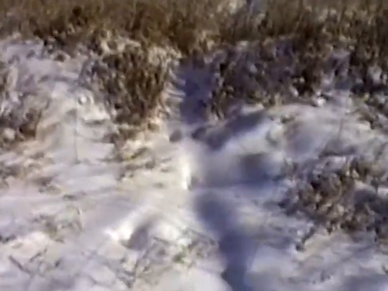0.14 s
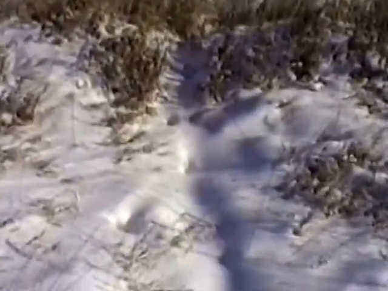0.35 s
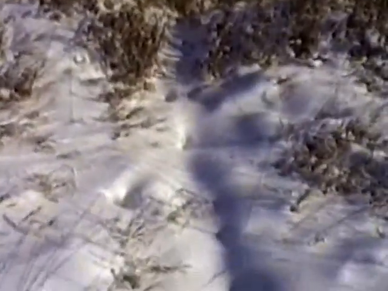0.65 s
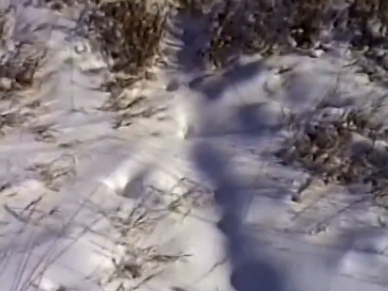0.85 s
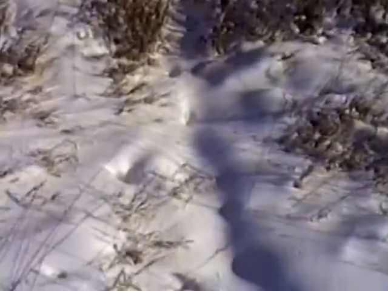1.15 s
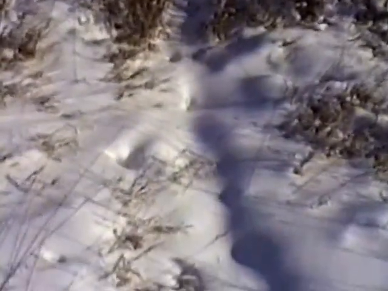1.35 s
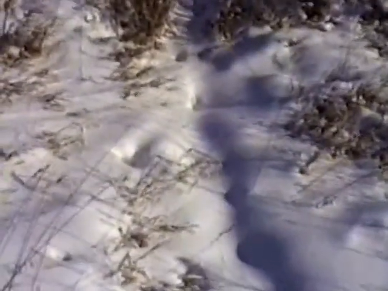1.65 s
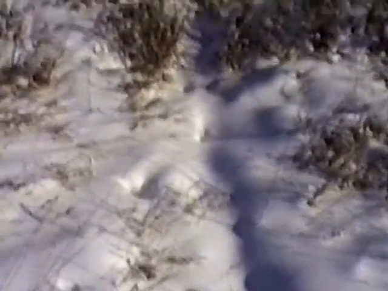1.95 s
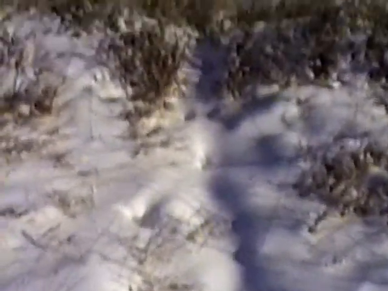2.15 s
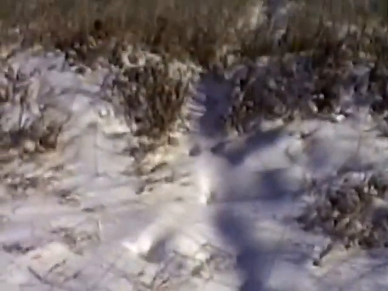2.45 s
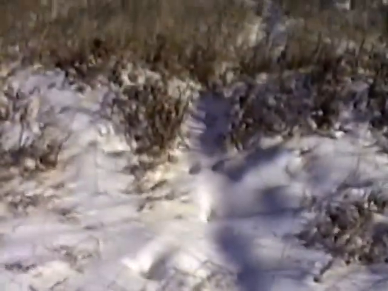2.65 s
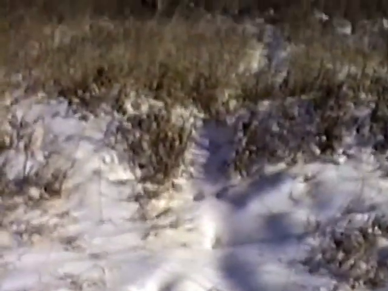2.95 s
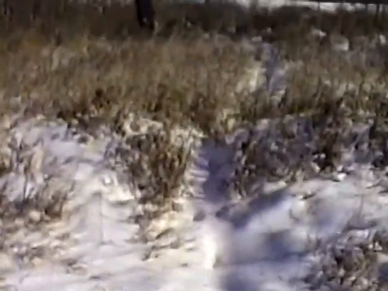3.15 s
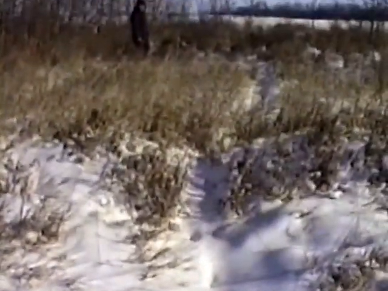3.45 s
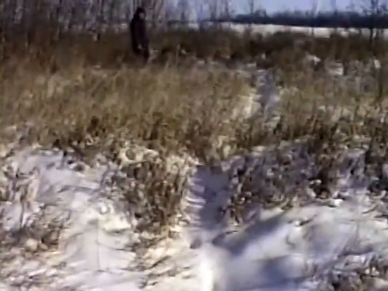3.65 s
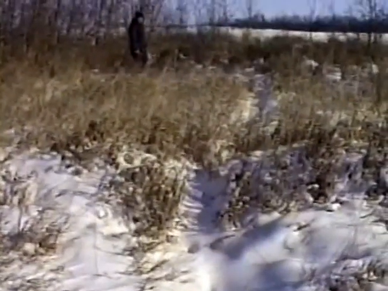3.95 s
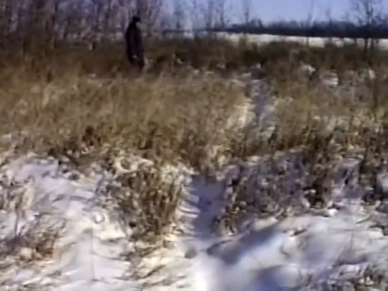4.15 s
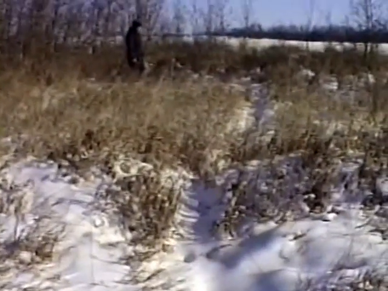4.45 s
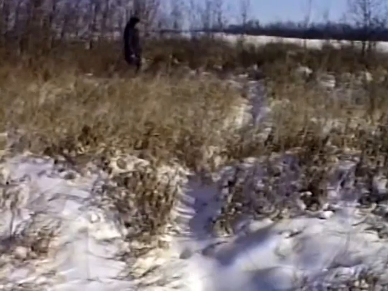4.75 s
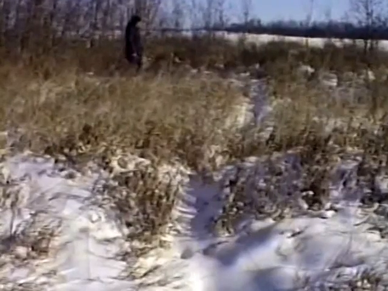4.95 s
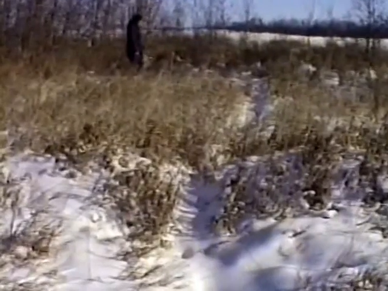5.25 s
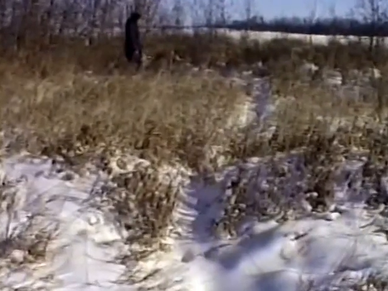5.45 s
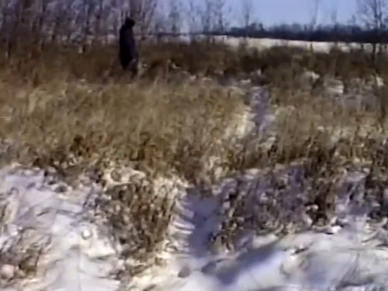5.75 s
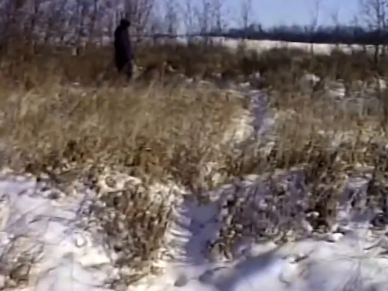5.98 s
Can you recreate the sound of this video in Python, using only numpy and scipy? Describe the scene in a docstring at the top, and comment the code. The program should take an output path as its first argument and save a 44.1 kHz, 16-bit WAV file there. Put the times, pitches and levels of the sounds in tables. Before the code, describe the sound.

Camera handling noise: hollow, hissy motor whirr throughout, sparse hard clicks at first, then bursts of scratchy rubbing and sharper knocks.

```python
"""A motor whirr under clicks and gloved rubbing, all hollowed by drifting comb notches, with hiss and whistles.
A tape camcorder in still, snowy country hears mostly itself. The whirr is coloured noise plus harmonics of
the head drum; rubs are noise of uneven slips; clicks are short pushes that ring the modes of the shell.
On playback two sound tracks mix in opposite polarity, one under a millisecond late and wavering."""
import sys
import numpy as np
from scipy import signal
from scipy.fft import rfft, irfft
from scipy.io import wavfile
from scipy.ndimage import uniform_filter1d, map_coordinates

SR = 44100
rng = np.random.default_rng(int(sys.argv[2]) if len(sys.argv) > 2 else 0)


def store_wav(level_fs):
    """Save 16-bit WAV to argv[1]."""
    pcm = np.round(np.clip(np.atleast_2d(level_fs), -1, 1) * 32767)
    wavfile.write(sys.argv[1], SR, pcm.T.astype(np.int16))


N = 269795
T = np.arange(N) / SR  # seconds
F = np.maximum(np.fft.rfftfreq(N, 1 / SR), 1)  # Hz, kept above zero for the logarithm

# resonant modes of the shell: pitch_hz, relative_level_db, t60_s (before stretching)
SHELL_MODES = [(140, -34, 0.044), (345, 6, 0.075), (409, -3, 0.064), (558, -8, 0.035), (765, -11.5, 0.075),
               (853, 3, 0.041), (987, 6, 0.026), (1104, -1, 0.075), (1440, 7.5, 0.034), (1640, 1, 0.036),
               (2060, -5, 0.023)]


def undb(db):
    """Amplitude ratio of a level in decibels: 20 dB is a factor of ten."""
    return 10 ** (np.asarray(db, float) / 20)


def level(x, db):
    """Scales a signal to an rms level, the root of its mean power."""
    return x * undb(db) / np.sqrt(np.mean(x ** 2))


def colour(x, points):
    """Linear filtering by a spectral envelope drawn through (Hz, dB) points on a log-frequency axis."""
    hz, db = np.transpose(points)
    envelope = undb(np.interp(np.log(F), np.log(hz), db))
    return irfft(rfft(x) * envelope, N)


def band(x, lo_hz, hi_hz):
    """Band-pass filtering with gentle, maximally flat skirts."""
    sos = signal.butter(2, [lo_hz, min(hi_hz, .45 * SR)], "bandpass", fs=SR, output="sos")
    return signal.sosfilt(sos, x)


def walk(rate_hz):
    """Slow random fluctuation: held random values, averaged twice over one hold; spread near 1."""
    hold = int(SR / rate_hz)
    steps = np.repeat(rng.standard_normal(N // hold + 1), hold)
    return 1.43 * uniform_filter1d(uniform_filter1d(steps, hold), hold)[:N]


def swelling_hiss(dry):
    """Amplitude-modulated noise: hiss, independent left and right, swells with the treble of the sound."""
    # hiss spectrum: pitch_hz, relative_db_per_hz
    hiss_spectrum = [(20, 0), (100, 15), (500, 2.5), (1300, -18), (3000, -5), (8000, 5.5), (12000, 1),
                     (16000, 5.5)]
    hiss_db = -71  # rms before swelling
    swell_share = .55  # share of the treble level, in dB, that the hiss follows
    treble_power = uniform_filter1d(band(dry[0], 3000, 11000) ** 2, size=512)
    swell = (treble_power / np.median(treble_power)) ** (swell_share / 2)
    hiss = [level(colour(rng.standard_normal(N), hiss_spectrum), hiss_db) for _ in range(2)]
    return swell * np.array(hiss)


def scan_whistles():
    """Beating: line-scan tones of camera and player, close in pitch, wander in level and phase."""
    # line-scan whistles: pitch_hz, level_db (rms, about which it wanders)
    whistles = [(15734.27, -62.5), (15747.2, -67.5)]
    total = np.zeros(N)
    for hz, db in whistles:
        gain = np.sqrt(2) * undb(db + 1.3 * walk(4))
        total += gain * np.sin(2 * np.pi * hz * T + .7 * walk(6))
    return total


def motor_noise():
    """Broadband machine noise: a fixed spectrum whose low part flickers in level."""
    # motor noise inside the shell: pitch_hz, relative_db_per_hz
    noise_spectrum = [(20, -9.5), (60, -13), (200, -0.5), (340, -1.5), (550, -6), (800, -1), (920, -1),
                      (1200, 0.5), (1800, -10.5), (2400, -12.5), (4300, -16), (8000, -22), (12000, -22),
                      (16000, -26)]
    noise = level(colour(rng.standard_normal(N), noise_spectrum), -51)
    flicker = undb(2.0 * walk(30))
    return noise + (flicker - 1) * band(noise, 270, 2150)


def drum_tones():
    """Harmonics of rotation: the head drum and its motor sound at whole multiples of the turning rate."""
    # tones of drum and motor: multiple of the turning rate -> level_db (rms, about which it wanders)
    harmonics = {2: -71.5, 3: -80, 4: -67.5, 5: -72, 7: -66.5, 16: -76.5, 24: -62.5, 28: -67.5, 30: -63.5,
                 31: -63, 36: -67.5, 48: -61, 60: -66.5, 64: -75, 100: -75.5}
    drum_hz = 30000 / 1001
    turn = 2 * np.pi * drum_hz * T
    total = np.zeros(N)
    for multiple, db in harmonics.items():
        gain = np.sqrt(2) * undb(db + 0.73 * walk(13))
        total += gain * np.sin(multiple * turn + 2 * np.pi * rng.random())
    return total


def rubs():
    """Stick-slip friction: dense uneven slips give a scratch, a bright edge and a drive to the low shell."""
    # glove strokes: start_s, length_s, level_db, swell_over_stroke_db, brightness_db, body_db
    strokes = [(0.044, .008, -58, -3, -10, 4), (1.98, .19, -64, 8.5, -8, -8),
               (2.458, .02, -51.5, -8, -16, -8), (2.603, 0.069, -61, 18, -24, -14),
               (2.736, .05, -51, -7, -20, 0), (3.073, 0.0077, -42, 1, -18, -6),
               (3.115, 0.14, -48.5, 0.5, -14, -6), (3.267, .12, -50.5, -17, -18, -12),
               (3.481, 0.082, -49, -5, -21, -10), (3.822, 0.038, -39, -2.5, -23, 3),
               (3.886, 0.058, -47.5, 13, -2.5, 0), (4.016, 0.2, -49.5, 7, -18, 1.5),
               (4.31, 0.11, -39, 1.5, -5, -5), (4.44, 0.252, -44.5, 5.5, -17, -3),
               (4.717, 0.028, -51.5, 1.5, -24, 0), (5.032, .008, -48, 0, -12, 0),
               (5.06, .1, -55.5, 1.5, -13, -3), (5.402, .012, -43, -4, -11, -1),
               (5.92, 0.16, -67.5, 6.5, 7, 5)]
    # colour of the scratch: pitch_hz, relative_db_per_hz
    scratch_spectrum = [(700, -21), (1500, -1.5), (2100, -1), (3100, 1), (4200, -3.5), (5600, -5.5),
                        (7500, -12.5), (11000, -19), (16000, -31)]
    attack_db_per_s, release_db_per_s = 705, 465
    slips = rng.standard_normal(N) * undb(2.3 * rng.exponential(size=N) + 1.6 * walk(120))
    scratch = level(colour(slips, scratch_spectrum), 0)
    bright = level(band(band(slips, 3970, 10360), 4800, 16700), -3.3)
    bright = bright * undb(2.0 * walk(18))  # comes in surges
    body = level(band(slips, 320, 1030), -9.5) + level(band(slips, 60, 240), -17)
    power = np.zeros((3, N))  # scratch, bright, body; overlapping strokes add in power
    for start, length, db, swell_db, bright_db, body_db in strokes:
        before_s = np.maximum(start - T, 0)
        after_s = np.maximum(T - start - length, 0)
        edges_db = attack_db_per_s * before_s + release_db_per_s * after_s
        progress = np.clip((T - start) / max(length, .002), 0, 1)
        stroke = undb(db + swell_db * progress - edges_db)
        power += (stroke * undb([[0], [bright_db], [body_db]])) ** 2
    return np.sum(np.sqrt(power) * [scratch, bright, body], axis=0)


def tick(t, db, hz, octaves, decay_ms):
    """Impulsive noise: a decaying crackle with a sung pitch, the clearer the narrower its band."""
    crackle = rng.standard_normal(len(t)) + 0.48 / octaves ** 2 * np.sin(2 * np.pi * hz * t)
    onset = np.minimum(t / 0.00019, 1)
    crackle = crackle * onset * np.exp(-t * 1000 / max(decay_ms, .3))
    half_width = 2 ** (octaves / 2)
    sound = band(crackle, hz / half_width, hz * half_width) + undb(-19.5) * band(crackle, 2000, 10000)
    # level is the energy spread over one decay time
    return undb(db) * sound / np.sqrt(np.sum(sound ** 2) / (decay_ms * SR / 1000))


def ring(push, weight_db, stretch):
    """Modal resonance: weighted decaying modes answer a push; a looser grip lets them ring longer."""
    t = T[:len(push)]
    modes = np.zeros(len(push))
    for (hz, db, t60), weight in zip(SHELL_MODES, weight_db):
        decay = np.exp(-np.log(1000) * t / (t60 * stretch))
        modes += undb(db + weight) * decay * np.sin(2 * np.pi * hz * t)
    return signal.fftconvolve(push, modes)[:len(push)]


def knock(t, db, hz, stretch):
    """Contact excitation: a softer contact pushes longer and so rings the shell's lower modes."""
    choice_db_per_octave = 20.5 * stretch  # the freer the ring, the purer
    push = np.sin(np.pi * np.clip(t * hz * 2.57, 0, 1)) ** 2
    mode_hz = np.array(SHELL_MODES)[:, 0]
    weight_db = -choice_db_per_octave * np.abs(np.log2(mode_hz / hz))
    sound = band(ring(push, weight_db, max(stretch, .2)), 144, 1.57 * hz)
    return undb(db) * sound / abs(sound).max()


def clicks():
    """Impact sound: each shell click joins a modal knock to a crackling tick; faint high ticks stand alone."""
    # shell clicks: start_s, knock_peak_db, knock_pitch_hz, ring_stretch (ratio),
    # tick_db, tick_centre_hz, tick_width_octaves, tick_decay_ms
    shell_clicks = [(0.2237, -30, 920, 1.2, -29, 3070, 1.18, 2.3), (.555, -48, 875, .8, -48, 3000, 2, 1.2),
                    (0.6139, -38, 930, .9, -39.5, 2620, 1.1, 2.1),
                    (1.4879, -16, 620, 0.68, -50, 1810, 2, 1.3),
                    (1.5393, -38, 860, 1.3, -38, 2800, 1.3, 1.7),
                    (1.8815, -43, 800, 0.78, -40, 5530, 1.9, 1.3),
                    (2.333, -29.5, 1410, 0.7, -36, 2760, 2.2, 0.96),
                    (2.4945, -32.5, 1000, 0.52, -30.5, 2000, 1.6, 1.8),
                    (2.716, -42, 830, .6, -44, 3970, 1.6, 2.1),
                    (2.7251, -24, 850, 1.5, -29.5, 3970, 1.17, 1.8),
                    (2.731, -34.5, 405, 1.1, -45, 4270, 1.1, 1.8),
                    (3.185, -34, 880, 0.88, -54, 3040, 1.7, .8),
                    (3.647, -28.5, 563, 0.72, -36, 3000, 2.8, 0.84),
                    (3.819, -39, 850, 0.73, -40, 3100, 1, 2.3),
                    (3.836, -28, 890, 1.6, -33.5, 1810, 1.2, 1.2),
                    (4.2631, -25, 1140, 0.3, -26, 2140, 1.53, 0.74),
                    (4.2668, -21.5, 850, 1.47, -22, 4070, 1.02, 1.64),
                    (4.649, -29, 935, 1, -36, 3030, 1.6, 1.2),
                    (4.7961, -16, 1510, 0.72, -34.5, 3720, 1, 0.9),
                    (4.798, -18, 960, 0.47, -31, 3520, 1.4, 1.4),
                    (4.802, -28, 432, 1.04, -37, 2490, 1.5, 2.3),
                    (5.032, -46, 947, .9, -44, 3010, 1.2, 2.5)]
    # faint high ticks with no knock: start_s, level_db, centre_hz
    high_ticks = [(4.959, -47, 8200), (5.082, -46, 9200), (5.599, -48, 7500), (5.927, -46, 8560),
                  (5.978, -50, 7500), (6.083, -39, 9050)]
    size = 4096  # samples given to each click
    out, t = np.zeros(N + size), T[:size]
    for start, knock_db, knock_hz, stretch, tick_db, tick_hz, octaves, tick_ms in shell_clicks:
        i = int(start * SR)
        out[i:i + size] += knock(t, knock_db, knock_hz, stretch)
        out[i:i + size] += tick(t, tick_db, tick_hz, octaves, tick_ms)
    for start, db, hz in high_ticks:
        i = int(start * SR)
        out[i:i + size] += tick(t, db, hz, octaves=1, decay_ms=0.88)
    return out[:N]


def scene():
    """Structure-borne sound: everything reaches the single microphone through the shell."""
    return np.tile(motor_noise() + drum_tones() + rubs() + clicks(), (2, 1))


def lag_ms():
    """Time-base error: a slow drift plus a wobble repeating with each turn of an uneven guide roller."""
    # slow drift of the edge track's lag: time_s, lag_ms
    drift = [(0.0, 0.83), (0.56, 0.82), (1.11, 0.82), (1.67, 0.84), (2.23, 0.87), (2.78, 0.84),
             (3.34, 0.87), (3.89, 0.85), (4.45, 0.841), (5.01, 0.85), (5.56, 0.81), (6.12, 0.853)]
    # what each turn of the roller adds: angle_degrees, lag_ms
    roller_lag = [(0.0, -0.024), (22.5, 0.0086), (45.0, 0.009), (67.5, -0.023), (90.0, -0.043),
                  (112.5, -0.027), (135.0, 0.026), (157.5, 0.021), (180.0, -0.0087), (202.5, 0.013),
                  (225.0, 0.032), (247.5, -0.015), (270.0, -0.013), (292.5, 0.0098), (315.0, 0.0036),
                  (337.5, 0.02)]
    roller_turn_s = 1.337
    wobble = np.interp(360 * T / roller_turn_s, *np.transpose(roller_lag), period=360)
    return np.interp(T, *np.transpose(drift)) + wobble


def edge_track(dry):
    """Varying delay: the edge track is band-limited, phase-led, given its own hiss and played late."""
    # phase lead of its head and equaliser: pitch_hz, lead_rad
    phase_lead = [(40, 1.97), (185, 0.98), (500, 0.79), (1300, 0.48), (3000, 0.79), (6000, 0.79),
                  (9000, 0.65)]
    gain_db, hiss_db, top_hz = 0.5, -65, 8300
    lead_hz, lead_rad = np.transpose(phase_lead)
    gain = undb(gain_db) / np.sqrt(1 + (F / top_hz) ** 6)
    lead = np.exp(1j * np.interp(np.log(F), np.log(lead_hz), lead_rad))
    edge = irfft(rfft(dry[0]) * gain * lead, N)
    edge = edge + level(band(rng.standard_normal(N), 140, top_hz), hiss_db)
    late = uniform_filter1d(lag_ms(), size=1536) * SR / 1000  # samples
    return map_coordinates(edge, [np.arange(N) - late], order=3, mode="nearest")


def record(dry):
    """Comb filtering: main minus late edge track leaves notches; hiss and whistles join; the top is cut."""
    # each is this much louder on the left and softer on the right
    main_left_db, edge_left_db, whistle_left_db = .27, -.13, .3
    mix = dry * undb([[main_left_db], [-main_left_db]])
    mix = mix - edge_track(dry) * undb([[edge_left_db], [-edge_left_db]])
    mix = mix + swelling_hiss(dry)
    mix = mix + scan_whistles() * undb([[whistle_left_db], [-whistle_left_db]])
    top_hz = 15800
    return signal.sosfilt(signal.ellip(10, .2, 70, top_hz, fs=SR, output="sos"), mix)


dry = scene()
out = record(dry)
store_wav(out)
```